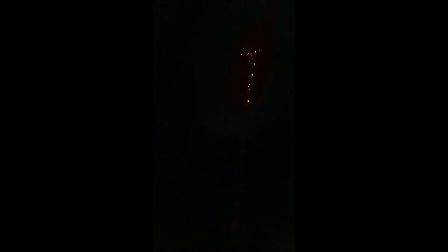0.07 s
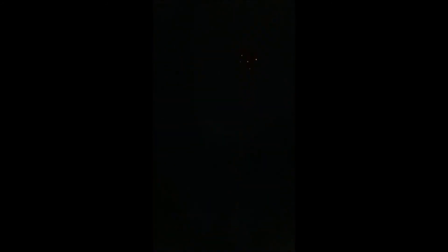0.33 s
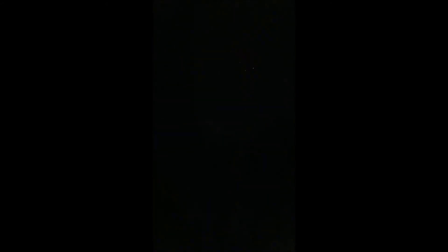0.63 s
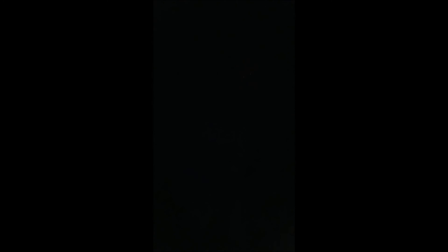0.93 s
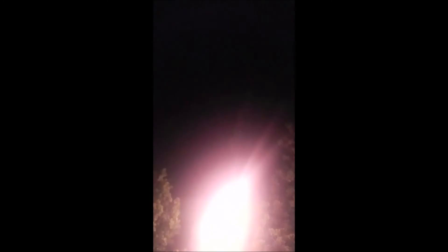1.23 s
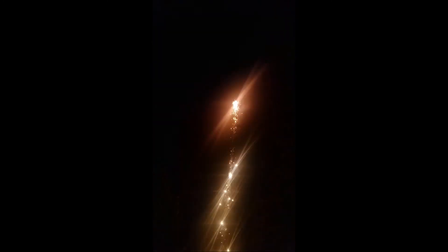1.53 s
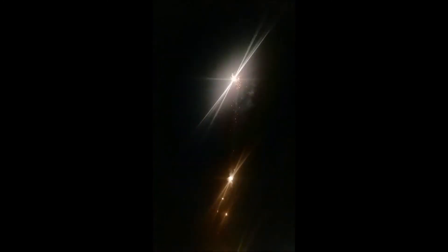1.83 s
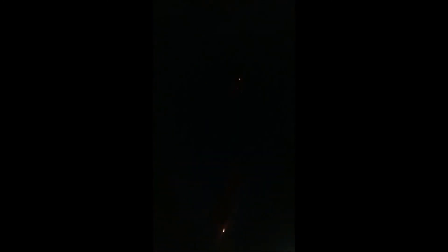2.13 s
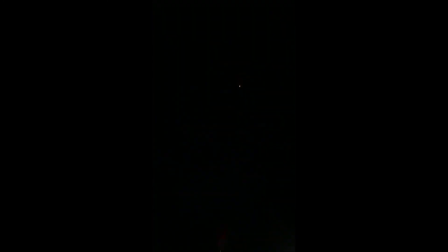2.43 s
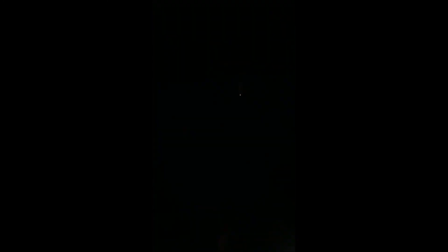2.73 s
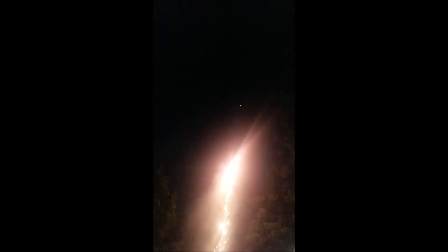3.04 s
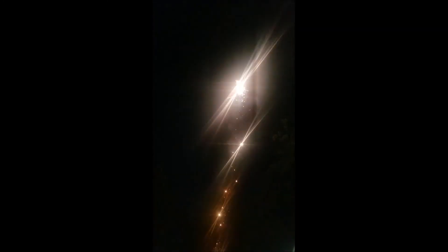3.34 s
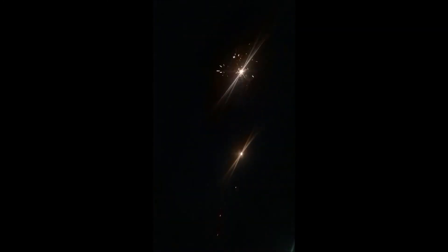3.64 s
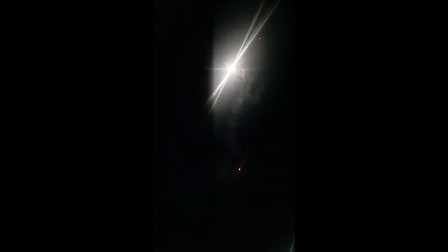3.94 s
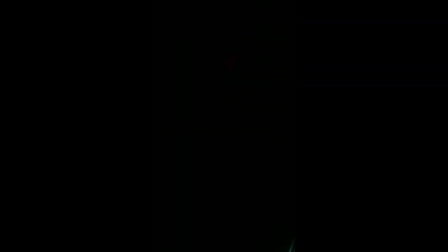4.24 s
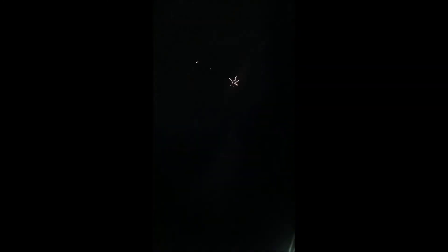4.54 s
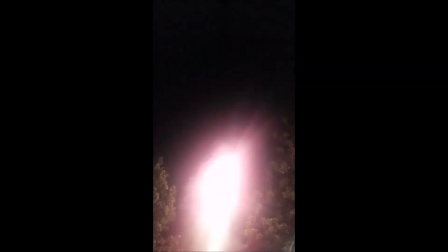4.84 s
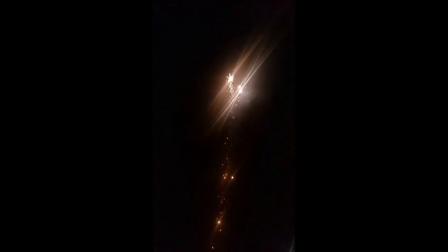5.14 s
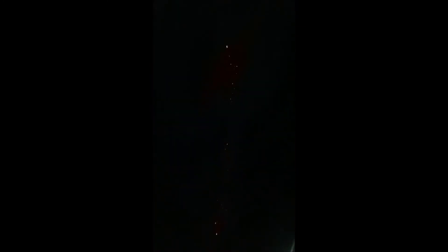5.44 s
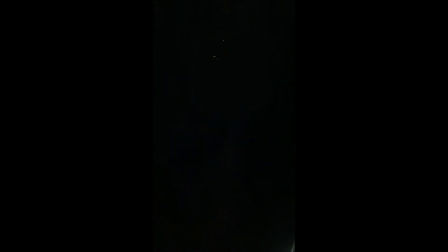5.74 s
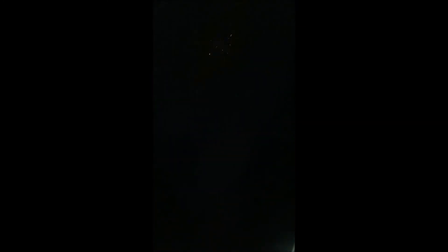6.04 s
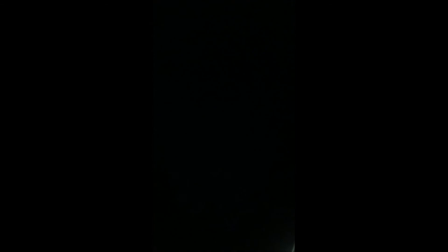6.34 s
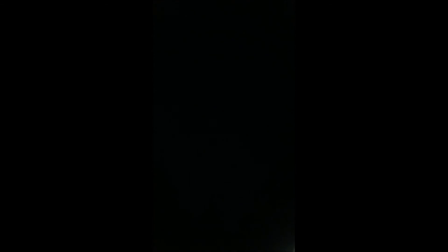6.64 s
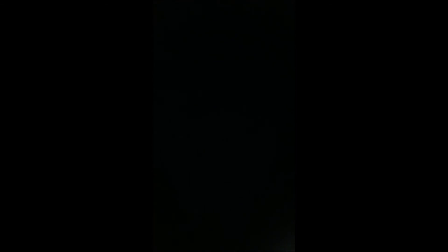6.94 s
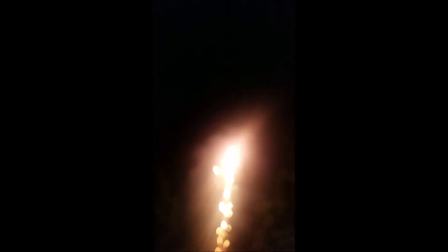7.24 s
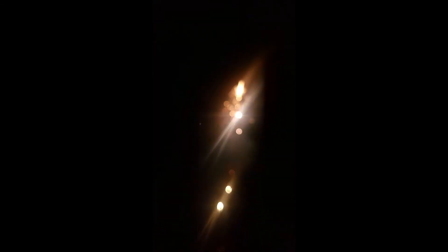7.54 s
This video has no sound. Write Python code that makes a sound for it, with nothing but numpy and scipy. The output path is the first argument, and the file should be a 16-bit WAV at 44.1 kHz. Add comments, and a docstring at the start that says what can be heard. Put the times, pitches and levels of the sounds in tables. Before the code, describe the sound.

After a stray crack, a firework tube launches four shots, each a hollow pop followed by a fizz of sparks and a quick, uneven run of crackling bangs. The first launch booms deepest and the second crackles longest. Every crack echoes briefly off surrounding houses and trees, and a few overload the microphone with a low thump. A very faint hum of distant town air fills the gaps.

```python
"""Roman candles fire four balls into the night over a yard. Each leaves its cardboard tube with a hollow
pop and a low boom, trails a sizzle of tiny sparks and sheds crackling stars that burst in sharp cracks.
Two walls slap every crack back, one on each side, and houses and trees add a hissing tail.
Three loud cracks overload the microphone, thumping in the left channel. Far-off town air murmurs."""
import sys
import numpy as np
from scipy import signal
from scipy.fft import rfft, irfft
from scipy.io import wavfile

SR = 44100
rng = np.random.default_rng(int(sys.argv[2]) if len(sys.argv) > 2 else 0)


def generate_wav(sig):
    """Save sig (samples, or channels by samples) to the path in sys.argv[1] as 16-bit PCM at SR."""
    pcm = np.round(np.clip(np.atleast_2d(sig).T, -1, 1) * 32767).astype(np.int16)
    wavfile.write(sys.argv[1], SR, pcm)


N = 334278
TIME_S = np.arange(N) / SR


def undb(db):
    """Decibels to gain."""
    return 10 ** (np.asarray(db) / 20)


def unit(x):
    """Scale to unit energy."""
    return x / np.sqrt(np.sum(x ** 2))


def add(out, start_s, x):
    """Mix x into out from start_s on."""
    i = max(int(round(start_s * SR)), 0)
    n = max(min(x.shape[-1], out.shape[-1] - i), 0)
    out[..., i:i + n] += x[..., :n]


def colour(x, points, size=4096):
    """Minimum-phase filter through (frequency [Hz], gain [dB]) points."""
    hz, db = np.transpose(points)
    log_hz = np.log(np.fft.rfftfreq(size, 1 / SR) + 1)
    log_gain = np.log(undb(np.interp(log_hz, np.log(hz), db)))
    cepstrum = irfft(log_gain)[:size // 2]
    cepstrum[1:] *= 2
    response = irfft(np.exp(rfft(cepstrum, size)))
    return np.apply_along_axis(lambda row: signal.fftconvolve(row, response)[:len(row)], -1, x)


# Night air spectrum: (frequency [Hz], relative density [dB])
AIR_SPECTRUM = [(25, -8), (75, -4), (125, -3.5), (220, -13.5), (500, -11.5), (1500, -14), (4000, -26.5),
                (9000, -40.5), (12000, -42.5), (16000, -31.5)]


def night_air(rms_db=-64.5, shared=0.66):
    """Faint, steady murmur of a far-off town."""
    noise = rng.standard_normal((2, N)) + shared * rng.standard_normal(N)
    return unit(colour(noise, AIR_SPECTRUM)) * np.sqrt(2 * N) * undb(rms_db)


def blast(peak_hz, bass_cut_hz=170, size=192):
    """Small explosion: pressure jump, then suction. So small a source has little bass."""
    pole, bass_pole = np.exp(-2 * np.pi * np.array([peak_hz, bass_cut_hz]) / SR)
    impulse = signal.unit_impulse(size)
    return unit(signal.lfilter(np.poly([1, 1]), np.poly([pole, pole, bass_pole]), impulse))


# Diffuse tail of the yard: (band [Hz], relative density [dB], T60 [s])
YARD_BANDS = [(90, -4, 0.61), (242.3, 7, 0.45), (587, 4, 0.81), (1260, 1.5, 0.96), (2570, 1.5, 0.85),
              (5000, 2.5, 0.72), (8700, 2.5, 0.49), (13900, -5.5, 0.57)]


def yard(x, near_db=0.5, near_decay_s=0.016, build_s=0.0047, ragged_db=3.0, size=49152):
    """Dense nearby scatter, then a long tail from houses and trees; new paths on every call."""
    t = TIME_S[:size]
    bands_hz, levels_db, t60s = np.transpose(YARD_BANDS)
    log_hz = np.log(np.fft.rfftfreq(size, 1 / SR) + 1)
    clumps = np.repeat(rng.standard_normal((2, size // 48)), 48, axis=1)
    scatter = rfft(rng.standard_normal((2, size)) * undb(ragged_db * clumps))
    near = 2 * undb(near_db) * np.exp(-t / near_decay_s)
    response = 0
    for share, db, t60_s in zip(np.eye(len(bands_hz)), levels_db, t60s):
        band = irfft(scatter * np.interp(log_hz, np.log(bands_hz), share), size)
        far = undb(-60 * t / t60_s) / 2
        response = response + undb(db) * band * (near + far)
    response = unit(response * (1 - np.exp(-t / build_s)) ** 2)
    return signal.fftconvolve(x[None], response, axes=1)[:, :len(x)]


def opening_tail(ago_s=0.11, db=6, crack_hz=2200):
    """Dying tail of a star that burst just before the start."""
    source, out = np.zeros(SR), np.zeros((2, N))
    add(source, 0, undb(db) * blast(crack_hz))
    add(out, 0, yard(source)[:, int(ago_s * SR):])
    return out


def add_with_walls(out, start_s, wave, jitter, right_db=-3.5, right_wall_s=.0067, right_wall_db=-7,
                   left_wall_s=.0118, left_wall_db=-2.5):
    """A burst reaches the left ear first; two walls return it, with delays that vary by position."""
    left, right = out
    add(left, start_s, wave)
    add(right, start_s + abs(.00014 + .00012 * jitter[0]), undb(right_db) * wave)
    dulled = np.convolve(wave, [.5, .5])
    add(right, start_s + right_wall_s + .00018 * jitter[1], undb(right_wall_db) * dulled)
    uneven_wall = unit(rng.standard_normal(64) * np.exp(-TIME_S[:64] / .00035))
    smeared = np.convolve(wave, uneven_wall)
    add(left, start_s + left_wall_s + .00097 * jitter[2], undb(left_wall_db) * smeared)


# Prominent star bursts: (time [s], relative energy [dB], shock pitch [Hz])
STAR_BURSTS = [(0.1947, 2.5, 2060), (1.2177, -5.5, 2670), (1.362, -2, 1410), (1.406, 4, 1100),
               (1.419, 9, 1500), (1.4416, 12.5, 2300), (1.543, -0.5, 1270), (1.5731, 8, 1350),
               (1.6035, 8.5, 2250), (1.6338, 9, 1410), (1.709, 8.5, 1210), (1.7599, 4, 1660),
               (1.8312, 5, 1470), (1.8777, -7, 2200), (2.0319, 8, 930), (2.9286, -1.5, 2600),
               (2.996, 2.5, 1410), (3.0394, 4, 1890), (3.093, 7, 1790), (3.4191, 6, 974.6),
               (3.4662, 11.5, 1310), (3.4868, 7.5, 1390), (3.512, 9, 1180), (3.5778, 4.5, 1870),
               (3.7216, -1.5, 1395), (3.7457, 8, 822), (3.758, 12, 1312), (3.7687, 11, 1134),
               (3.9104, 7, 1110), (3.9525, 1, 1550), (4.035, 7, 850), (4.0664, -1, 2180),
               (4.4681, 11, 1166), (4.8636, -1, 1020), (4.9204, -2.5, 1200), (4.979, 4, 800),
               (5.0684, 4.5, 1600), (5.1337, 7, 1150), (5.1595, 8, 1720), (5.2215, 9, 1000),
               (5.3278, 7, 1616), (5.3573, 3.5, 2010), (5.6809, -2, 1320), (5.975, 14.5, 1250),
               (7.1581, -4.5, 1360), (7.172, 5, 920), (7.191, 2, 2400), (7.2329, 6, 2200),
               (7.2923, 7.5, 1230), (7.3317, 10, 1910), (7.3822, 11, 2330), (7.3967, -1, 2280),
               (7.472, 8, 1420), (7.5283, 3.5, 740)]


def stars(typical_hz=1800, direct_db=-3, tail_db=-4.0, place_count=5, max_bursts=256):
    """Each star bursts in one shock wave, at one of several places in the sky."""
    direct, places = np.zeros((2, N)), np.zeros((place_count, N))
    jitters = rng.standard_normal((max_bursts, 3))
    for k, ((start_s, db, hz), jitter) in enumerate(zip(STAR_BURSTS + crackle(), jitters)):
        add_with_walls(direct, start_s, undb(db) * blast(hz), jitter)
        # tails are pulled toward a typical pitch, so deep cracks still leave a bright hiss
        tail_hz = np.sqrt(hz * typical_hz)
        add(places[k % place_count], start_s, undb(db) * blast(tail_hz))
    return undb(direct_db) * direct + undb(tail_db) * sum(yard(source) for source in places)


# Gas rush at the muzzle: (frequency [Hz], gain [dB])
MUZZLE_SPECTRUM = [(60, -17), (180, 0.5), (400, -7.5), (650, -1), (1000, -7), (1700, -12.5), (2900, -8),
                   (4000, -16), (8000, -21), (15000, -31.5)]
# Balls fired, levels relative: (time [s], pop [dB], leak lead [s], tube pitch [Hz], rumble [dB],
# sizzle [dB], sizzle peak delay [s], crackle delay [s], crackle length [s], crackle [dB])
SHOTS = [(1.057, 5, .02, 457, 4, -32.5, 0.47, 0.56, .15, -2),
         (2.778, 0, .013, 473, -11, -23, 0.58, 0.29, .32, 5),
         (4.680, 0, 0.0077, 418, -14.5, -32.5, 0.53, .32, .1, 7.5),
         (6.997, -0.5, .015, 408, -31, -31, 0.37, .215, .28, -1.5)]


def pops(open_s=.003, rise_s=0.009, fall_s=0.0081, gas_db=1.0, ring_s=0.0029, ring_db=-1,
         clack_hz=3040, clack_s=.002, clack_db=-11,
         direct_db=-4, tail_db=-7, house_s=0.098, house_db=-16):
    """Gas leaks ever harder until the ball clears the muzzle; the tube rings, with a high clack."""
    out = np.zeros((2, N))
    for exit_s, db, leak_s, tube_hz, *_ in SHOTS:
        t = TIME_S[:SR] - leak_s
        after_s = np.maximum(t, 0)
        opening = 1 - np.exp(-TIME_S[:SR] / open_s)
        surge = np.exp(np.minimum(t / rise_s, -t / fall_s))
        gas = colour(rng.standard_normal(SR) * opening * surge, MUZZLE_SPECTRUM)
        ring = np.sin(2 * np.pi * tube_hz * after_s) * np.exp(-after_s / ring_s)
        clack = np.sin(2 * np.pi * clack_hz * after_s) * np.exp(-after_s / clack_s)
        pop = undb(gas_db) * unit(gas) + undb(ring_db) * unit(ring) + undb(clack_db) * unit(clack)
        pop *= undb(db)
        echoes = yard(pop)
        add(out, exit_s - leak_s, undb(direct_db) * pop + undb(tail_db) * echoes)
        # the pop starts near the ground, so a house front returns it, dulled
        house_echo = colour(echoes, [(100, -1.0), (2500, 3.0), (9000, -15)])
        add(out, exit_s - leak_s + house_s, undb(house_db) * house_echo)
    return out


def rumble(boom_s=0.012, roll_s=0.32, roll_db=-13, edge_hz=190):
    """The low boom of each lifting charge rolls on among the houses."""
    out, t = np.zeros((2, N)), TIME_S[:SR]
    envelope = np.exp(-t / boom_s) + undb(roll_db) * np.exp(-t / roll_s)
    spectrum = [(20, -12), (50, 0), (edge_hz, 0), (3 * edge_hz, -22), (4000, -60)]
    for exit_s, _, _, _, db, *_ in SHOTS:
        boom = unit(colour(rng.standard_normal(SR) * envelope, spectrum))
        add(out, exit_s - .005, undb(db) / 2 * boom)
    return out


def sizzle(sparks_per_s=260, scatter_db=4.5, spark_hz=1900, size_count=3, rise_s=0.18, fall_s=0.1,
           ignite_s=0.018, flame_db=-47, flame_s=0.23, tail_db=-4):
    """The burning ball hisses from the muzzle on, while its sparks swell and fade."""
    spark_gain, flame_gain = np.zeros(N), np.zeros(N)
    age_s = TIME_S[:2 * SR]
    lit = np.clip(age_s / ignite_s, 0, 1)
    for exit_s, _, _, _, _, db, peak_s, *_ in SHOTS:
        swell = np.exp(np.minimum((age_s - peak_s) / rise_s, (peak_s - age_s) / fall_s))
        add(spark_gain, exit_s, lit * undb(db) * swell)
        add(flame_gain, exit_s, lit * undb(flame_db) * np.exp(-(age_s / flame_s) ** 2))
    direct, source = np.zeros((2, N)), np.zeros(N)
    # sparks come in three sizes, each scattered over the whole trail
    for hz in spark_hz * np.geomspace(.5, 2, size_count):
        fires = rng.random(N) < sparks_per_s / size_count / SR
        sparks = fires * undb(scatter_db * np.minimum(rng.exponential(size=N), 3))
        burn = unit(sparks) * np.sqrt(N) * spark_gain + flame_gain * rng.standard_normal(N)
        ticks = np.convolve(burn, blast(hz))[:N] / np.sqrt(size_count)
        add_with_walls(direct, 0, ticks, rng.standard_normal(3))
        source += ticks
    return direct / 2 + undb(tail_db) * yard(source)


def crackle(cracks_per_s=55, uneven=.35, scatter_db=3.5, start_hz=2100, sag_hz_per_s=700,
            pitch_spread=.22, max_stars=32):
    """Each ball sheds small stars at uneven gaps, duller as it climbs; rows as in STAR_BURSTS."""
    cracks = []
    for exit_s, *_, delay_s, length_s, db in SHOTS:
        for k, (late, loud, bright) in enumerate(rng.standard_normal((max_stars, 3))):
            age_s = (k + uneven * late) / cracks_per_s
            if age_s < length_s:
                hz = (start_hz - sag_hz_per_s * age_s) * np.exp(pitch_spread * bright)
                cracks.append((exit_s + delay_s + age_s, db + scatter_db * loud, hz))
    return cracks


# Microphone overload thumps: (time [s], pitch [Hz], level [dB], decay [s])
OVERLOAD_THUMPS = [(1.7093, 83, -1.5, 0.0037), (2.033, 124, -5, 0.0048), (5.9747, 109, -5, 0.0028)]


def overload_thumps(attack_s=0.000067, right_db=-22, tail_db=-14):
    """Low thumps, mainly in the left channel, as three loud cracks overload the microphone."""
    left, t = np.zeros(N), TIME_S[:SR // 10]
    for start_s, hz, db, decay_s in OVERLOAD_THUMPS:
        envelope = np.exp(-t / decay_s) * (1 - np.exp(-t / attack_s))
        add(left, start_s, undb(db) * np.cos(2 * np.pi * hz * t + .5) * envelope)
    return np.array([left, undb(right_db) * left]) + undb(tail_db) * yard(left)


def scene():
    """Launches, trails and bursts over the quiet night."""
    return pops() + rumble() + sizzle() + stars() + opening_tail() + overload_thumps() + night_air()


# Microphone response: (frequency [Hz], gain [dB])
MIC_RESPONSE = [(100, -1.5), (400, 0.5), (1000, -3), (2200, -1), (4000, -1.5), (6000, -0.5), (8200, 1.5),
                (9400, -1.5), (12000, 6.5), (15500, 3.5)]


def record(dry, ceiling=1.0, clip_above_hz=400, top_hz=15900):
    """The microphone lifts the treble, soft-clips peaks while sparing the bass, and cuts the top."""
    heard = colour(dry, MIC_RESPONSE)
    excess = heard - heard / (1 + (heard / ceiling) ** 4) ** .25
    highpass = signal.butter(2, clip_above_hz, "high", fs=SR, output="sos")
    lowpass = signal.ellip(10, .2, 80, top_hz, fs=SR, output="sos")
    shaved = heard - signal.sosfilt(highpass, excess)
    return signal.sosfilt(lowpass, shaved)


dry = scene()
out = record(dry)
generate_wav(out)
```